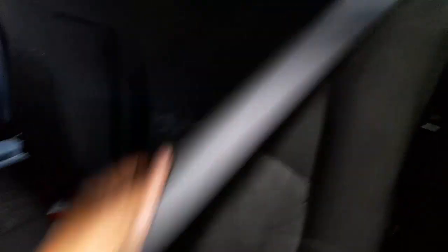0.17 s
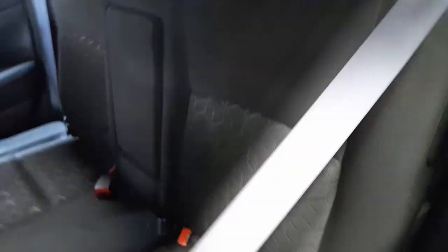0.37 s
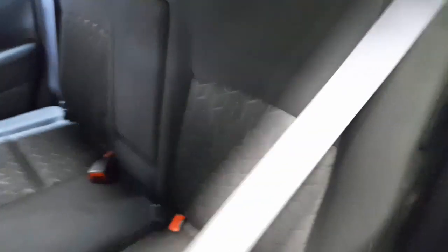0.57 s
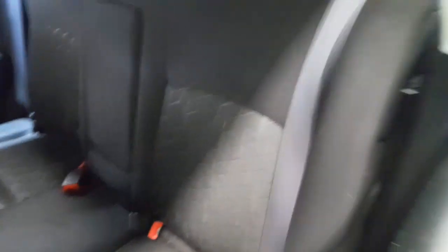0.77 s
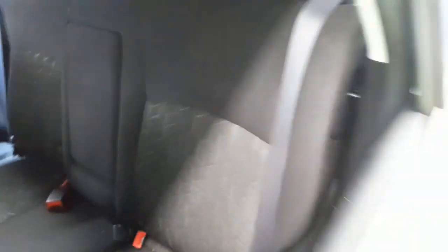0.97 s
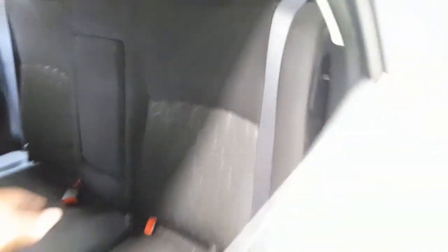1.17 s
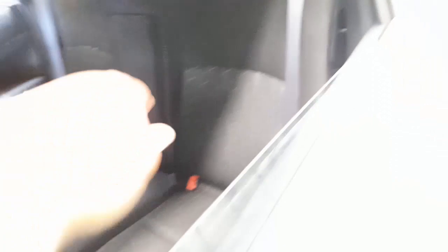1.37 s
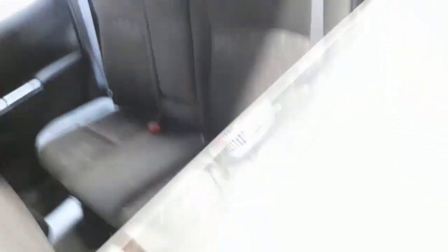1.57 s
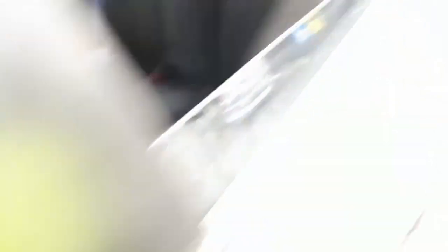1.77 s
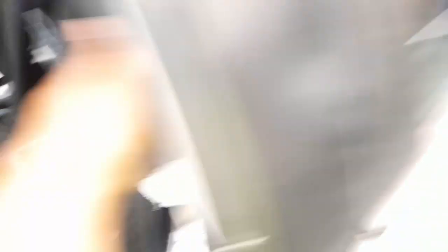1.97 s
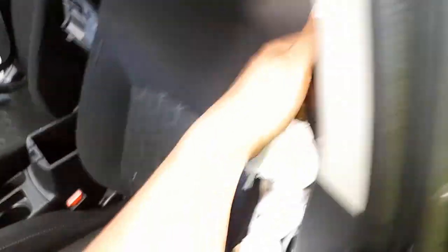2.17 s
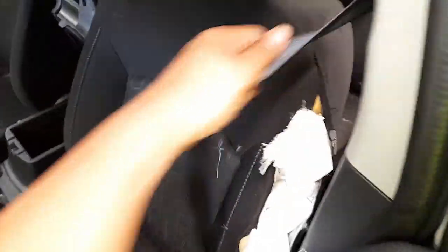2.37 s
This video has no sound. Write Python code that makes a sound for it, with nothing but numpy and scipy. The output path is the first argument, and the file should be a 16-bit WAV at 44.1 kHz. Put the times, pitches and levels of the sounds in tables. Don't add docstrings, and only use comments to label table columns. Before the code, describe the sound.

A car seat belt is pulled twice with a rising zipping whir, then locks with a hard clunk

```python
import sys
import numpy as np
from scipy import signal
from scipy.io import wavfile
from scipy.ndimage import uniform_filter1d

SR = 44100
rng = np.random.default_rng(int(sys.argv[2]) if len(sys.argv) > 2 else 0)


def volts(x):
    e = np.asarray(x, float) / 20
    return 10 ** e


def generate_wav(signal):
    frames = np.transpose(np.atleast_2d(signal))
    scaled = np.clip(frames, -1, 1) * 32767
    pcm = np.round(scaled).astype(np.int16)
    wavfile.write(sys.argv[1], SR, pcm)


N = 106192
T = np.arange(N) / SR

# freq_hz, likeness (1 = same, 0 = unrelated)
EAR_LIKENESS = [(60, 0.85), (180, 1), (550, 0.41), (1650, -0.13), (4970, -0.14), (15000, 0.0044)]


def evened(x):
    return x / np.sqrt(np.mean(x ** 2) + 1e-20)


def read(points, hz):
    f, value = np.transpose(points)
    return np.interp(np.log(hz + 1), np.log(f + 1), value)


def slow(per_s):
    size = max(int(SR / per_s), 2)
    drift = uniform_filter1d(rng.standard_normal(N), size)
    return evened(uniform_filter1d(drift, size))


def resonate(x, hz, width):
    b, a = signal.iirpeak(min(hz, 20000), max(hz / width, .3), SR)
    return signal.lfilter(b, a, x)


def two_ears(left_db, right_db):
    return volts(np.array([[left_db], [right_db]]))


def noise(shape, patchy_db):
    # freq_hz, left_minus_right_db
    ear_balance = [(60, -2), (180, -3), (550, 1), (1650, -5), (4970, 1), (15000, -1)]
    frames, hz = N // 256 + 5, np.fft.rfftfreq(1024, 1 / SR)
    a, b, c, d, patches = rng.standard_normal((frames, 513, 5)).T
    patches = uniform_filter1d(patches, size=10, axis=0)
    patches = evened(uniform_filter1d(patches, size=10, axis=1))
    same = np.clip(read(EAR_LIKENESS, hz), -1, 1)[:, None]
    lean = read(ear_balance, hz)[:, None] / 2
    left = a + 1j * b
    right = same * left + np.sqrt(1 - same ** 2) * (c + 1j * d)
    z = np.array([left * volts(lean), right * volts(-lean)])
    too_low = hz[:, None] < shape[0][0]
    z *= volts(read(shape, hz)[:, None] - 40 * too_low + patchy_db * patches)
    return evened(signal.istft(z, nperseg=1024, noverlap=768)[1][:, :N])


def cabin_echo(x):
    t = np.arange(6000) / SR
    t60_s, echo_db = 0.043, -4
    tail = rng.standard_normal((2, 6000)) * volts(-60 * t / t60_s) * (t > .0015)
    tail = signal.sosfilt(signal.butter(2, 350, "high", fs=SR, output="sos"), tail)
    tail = tail / np.linalg.norm(tail[0])
    return x + volts(echo_db) * signal.fftconvolve(x, tail, axes=1)[:, :N]


def pull(rows, orders):
    # pitch_hz, width_hz, left_db, right_db
    loop_rings = [(736, 230, -5, -5.5), (1100, 370, 6, 6), (1450, 530, -1.5, 7), (2010, 350, 9.5, 4),
                  (2460, 300, 5, 4.5), (3130, 500, 4.5, -1.5), (3440, 410, 7, -12), (4140, 200, 15.5, -3),
                  (4900, 460, 2, -3), (5160, 250, 7.5, -9)]
    # freq_hz, level_db per Hz
    webbing_rub = [(100, 5), (330, -13), (700, -31), (1300, -11.5), (2500, -10.5), (5000, -11),
                   (8500, -21.5), (15800, -27)]
    s, hz, sing_db, rub_db, second_db = np.transpose(rows)
    gate = np.clip(np.minimum(T - s[0], s[-1] - T) / 0.0073, 0, 1)
    rate_hz = np.interp(T, s, hz)
    turns = np.cumsum(rate_hz * (1 + .007 * slow(per_s=108))) / SR
    flutter_db = 2.6

    weave = 0
    for k, db in orders:
        order_db = db + flutter_db * slow(per_s=120)
        if k == 2:
            order_db = order_db + np.interp(T, s, second_db)
        if k > 5:
            order_db = order_db - 23 * rate_hz / 1000
        weave = weave + volts(order_db) * np.sin(2 * np.pi * k * turns)
    weave = np.sqrt(2) * weave * gate * volts(np.interp(T, s, sing_db))

    sung = 0
    for k, (f, w, left_db, right_db) in enumerate(loop_rings):
        sung = sung + (-1) ** k * resonate(weave, f, w) * two_ears(left_db, right_db)

    hum_hz, hum_width_hz, hum_db = 965, 210, -60
    hum_gain = volts(hum_db + flutter_db * slow(per_s=70))
    hum = hum_gain * np.sqrt(2) * np.sin(2 * np.pi * turns) * gate
    sung = sung + resonate(resonate(hum, hum_hz, hum_width_hz), hum_hz, hum_width_hz)

    spool = evened(resonate(rng.standard_normal(N), 326, 55))
    spool = volts(-1.5 + 2 * slow(per_s=120)) * spool
    rub = noise(webbing_rub, patchy_db=3.0) + spool
    return sung + rub * gate * volts(np.interp(T, s, rub_db))


def seat_belt():
    # start_s, weave_rate_hz, singing_db, rubbing_db, second_multiple_extra_db
    tug = [(.045, 300, -60, -70, 0), (.058, 335, -43, -67, 0), (.078, 390, -45, -65, 0),
           (.092, 400, -75, -66, 0), (.125, 400, -70, -68, 0), (.14, 410, -52, -70, 0)]
    first_pull = [(.152, 423, -66, -63, 5), (.174, 493.5, -52, -64, -13), (.195, 616, -58, -57, 8),
                  (.225, 774, -52.5, -54, 2.5), (.252, 845, -55, -51, 2), (.305, 1001, -58.5, -49.5, 7),
                  (.345, 988, -61.5, -50, 5), (.368, 880, -62.5, -52.5, -0.5), (.42, 756, -75, -56, 3)]
    second_pull = [(.62, 765, -78, -63, -6), (.67, 900, -58, -55, -3), (.715, 940, -68.5, -57, 1),
                   (.74, 1055, -49.5, -50, -3.5), (.76, 1078, -49.5, -55.5, -0.5),
                   (.782, 1228, -61.5, -46, 6), (.812, 1258, -57, -51, 10.5), (.84, 1300, -48, -50, -5),
                   (.868, 1360, -53, -41, -4)]
    # multiple of the weave rate, level_db
    multiples = [(2, -3), (3, -20), (4, -3), (6, 8)]
    belt = pull(tug, multiples[:1]) + pull(first_pull, multiples) + pull(second_pull, multiples)
    echo_share = .35
    return (1 - echo_share) * belt + echo_share * cabin_echo(belt)


def tick(s, hz, left_db, right_db):
    ring_cycles, rise_cycles = 0.67, .12
    turns = np.maximum(T - s, 0) * hz
    shape = np.exp(-turns / ring_cycles) * (1 - np.exp(-turns / rise_cycles))
    return -np.sin(2 * np.pi * turns) * shape * two_ears(left_db, right_db)


def placed(x, s):
    return np.pad(x, ((0, 0), (round(s * SR), N)))[:, :N]


def blow(s, click_db, thud_db, push, pitch):
    # pitch_hz, level_db, t60_s
    trim_rings = [(770, -8, 0.074), (1038, 1, 0.021), (1230, -3, 0.018), (1370, -1.5, 0.013),
                  (1700, -8, 0.014), (1973, -9, 0.025), (2300, -24, 0.022), (2577, -14, 0.012),
                  (2980, -28, 0.016), (3780, -31, 0.016), (4240, -17, 0.036), (4550, -29, 0.028),
                  (5470, -39, 0.016)]
    # pitch_hz, level_db, t60_s
    body_rings = [(74.6, 3.5, 0.2), (123.4, -2.5, 0.15), (193, -6, 0.16), (232.5, 5.5, 0.071),
                  (277.4, -2, 0.14), (336.8, -7, 0.3), (369, -8.5, 0.23), (429, -15.5, 0.17)]
    left_lag_s, thud_lag_s = 0.0001, .0006
    t = np.maximum(np.arange(SR // 2) / SR - np.array([[left_lag_s], [0]]), 0)
    ring = 0
    for hz, db, t60 in trim_rings:
        ear_db = 1.5 * rng.standard_normal((2, 1))
        ring = ring + volts(db - 60 * t / t60 + ear_db) * np.sin(2 * np.pi * hz * pitch * t)
    crack = resonate(rng.standard_normal(t.shape), 3600, 4000)
    crack = volts(-7.5) * crack * np.exp(-t / 0.0018) * (t > 0)

    t = np.maximum(t - thud_lag_s, 0)
    thud = 0
    for hz, db, t60 in body_rings:
        swell = 1 - np.exp(-t * hz)
        thud = thud + volts(db - 60 * t / t60) * swell * np.sin(2 * np.pi * hz * t)
    click = cabin_echo(placed(-.5 * volts(click_db) * (ring + crack), s))
    return click + placed(push * volts(thud_db) * thud, s)


def lock():
    # start_s, pitch_hz, left_db, right_db
    pawl_ticks = [(0.0205, 1260, -30, -31), (0.8734, 1850, -7, -18), (0.8738, 1720, -12, -9.5),
                  (.8830, 1410, -6, -17), (.8838, 1180, -28, -5.5), (0.8845, 5230, -12, -26),
                  (0.8865, 206, -6.5, -13), (.8867, 1970, -4, -26), (0.8865, 1880, -5, -14),
                  (.8880, 1590, -20, -9), (0.8901, 1700, -19, -27), (0.8997, 1500, -26, -16),
                  (0.9057, 1700, -28, -44), (0.9128, 1870, -28, -37), (0.9247, 1100, -24, -25),
                  (.9270, 1380, -24, -25), (0.9286, 1100, -24, -29), (0.9413, 1500, -35, -35)]
    # start_s, trim_click_db, body_thud_db, push (size and direction), trim pitch factor
    lock_blows = [
        (0.8730, -25, -51, 0.8, 1.4),
        (0.8830, -17, -24, 0.95, 1.0),
        (0.8865, -21, -16.5, -0.79, 1.013),
        (0.8917, -24, -18.5, 0.59, 0.86),
        (0.904, -28.5, -22.5, 0.47, 0.67),
        (0.9250, -28.5, -27, 0.83, 1.0),
        (1.012, -54, -51, 0.84, 0.87),
    ]
    ticks = cabin_echo(sum(tick(*row) for row in pawl_ticks))
    return ticks + sum(blow(*row) for row in lock_blows)


def scuff(s, length, db, hz, width):
    a, b = rng.standard_normal((2, N)) * volts(2.2 * slow(per_s=470))
    same = np.clip(read(EAR_LIKENESS, hz), -1, 1)
    grains = np.array([a, same * a + np.sqrt(1 - same ** 2) * b])
    tone = resonate(grains, hz, hz * width)
    tone = evened(resonate(tone, hz, hz * width * 2))
    stroke = np.exp(-((T - s) / (length / 2)) ** 2)
    pan_db = -3 * (1 - same)
    return tone * volts(db) * stroke * two_ears(pan_db / 2, -pan_db / 2)


def hand():
    stroke_s = [.14, .33, .77, .82, 1.05, 1.268, 1.277, 1.57, 1.6, 1.63, 1.75, 1.875, 1.888, 1.92, 2.15,
                2.22, 2.26, 2.285, 2.3, 2.36, 2.395, .02, .745, .908, .94, 1.272, 2.14, 1.58]
    # length_s, level_db, pitch_hz, width (share of the pitch)
    strokes = [(0.068, -45, 80, 0.48), (0.17, -42.5, 54, 1), (0.088, -43, 84, 0.19),
               (0.053, -34.5, 260, 0.4), (0.26, -62.5, 2450, 0.08), (0.035, -48.5, 1030, 0.66),
               (0.065, -49, 2040, 0.96), (0.25, -50, 595, 0.42), (0.085, -52, 2050, 0.32),
               (0.063, -60.5, 10700, 0.45), (0.19, -42.5, 155, 0.65), (0.12, -57, 6800, 0.46),
               (0.05, -46.5, 2060, 0.36), (0.04, -46, 49, 0.81), (0.043, -56.5, 11000, 0.66),
               (0.025, -51.5, 11300, 0.35), (0.12, -48.5, 2020, 0.38), (0.12, -43.5, 1180, 0.46),
               (0.076, -34.5, 290, 0.57), (0.092, -43.5, 2260, 0.19), (0.094, -44, 710, 1),
               (0.077, -48.5, 430, 0.21), (0.031, -65, 11000, .9), (0.024, -43, 750, 0.47),
               (0.078, -51.5, 990, 0.51), (0.041, -53, 2700, 0.3), (0.17, -44, 280, 0.44),
               (0.21, -54, 280, 0.22)]
    return sum(scuff(s, *row) for s, row in zip(stroke_s, strokes))


def cabin_background():
    # freq_hz, level_db per Hz
    rumble_shape = [(25, -17), (45, -7.5), (65, 1), (120, -5), (240, -8.5), (460, -18.5), (620, -28.5),
                    (1300, -59)]
    # freq_hz, level_db per Hz
    hiss_shape = [(290, -34), (500, -10), (612, -6.5), (865, -10.5), (2670, -18), (5030, -20),
                  (8960, -28.5), (11100, -25.5), (15700, -32.5)]
    # pitch_hz, width_hz, level_db
    air_booms = [(319.2, 24, -8), (117.6, 28, -9)]
    # time_s, rumble_db, hiss_db
    loudness = [(0.0, -42, -59.5), (0.24, -47, -60.5), (0.43, -47, -63.5), (0.67, -47, -66),
                (0.86, -41.5, -61), (1.17, -46, -60.5), (1.58, -40, -56.5), (1.72, -44, -55.5),
                (1.98, -40, -57), (2.17, -39.5, -54.5), (2.32, -39, -49.5), (2.41, -35, -50.5)]
    s, rumble_db, hiss_db = np.transpose(loudness)
    rumble = noise(rumble_shape, patchy_db=1.0)
    for hz, w, db in air_booms:
        rumble = rumble + volts(db) * evened(resonate(rng.standard_normal(N), hz, w))
    rumble = rumble * volts(np.interp(T, s, rumble_db) + 0.5 * slow(per_s=60))
    hiss_gain = volts(np.interp(T, s, hiss_db) + 7 + 0.23 * slow(per_s=600))
    return rumble + noise(hiss_shape, patchy_db=2.0) * hiss_gain


def scene():
    return seat_belt() + lock() + hand() + cabin_background()


def roll_off(x):
    return signal.sosfilt(signal.butter(12, 15870, fs=SR, output="sos"), x)


def record(dry):
    dry = signal.sosfilt(signal.butter(3, 44, "high", fs=SR, output="sos"), dry)
    treble_edge = signal.firwin(255, 15900, window=("kaiser", 8), fs=SR)
    dry = signal.oaconvolve(dry, treble_edge[None], "same")
    return roll_off(dry)


dry = scene()
out = record(dry)
generate_wav(out)
```